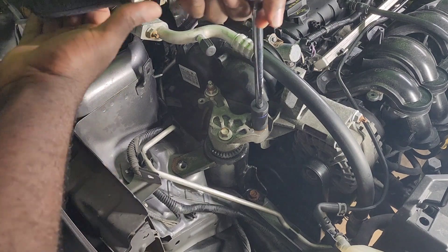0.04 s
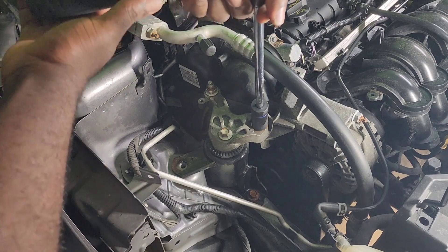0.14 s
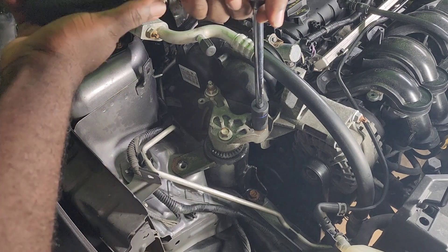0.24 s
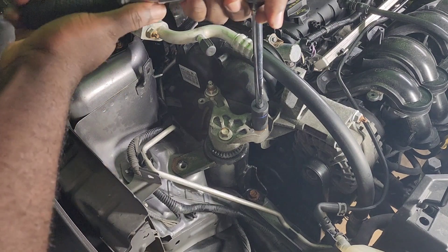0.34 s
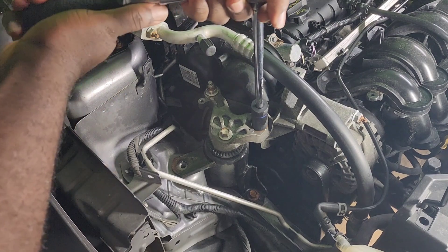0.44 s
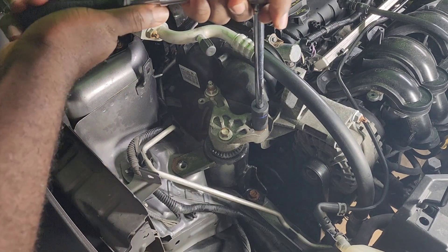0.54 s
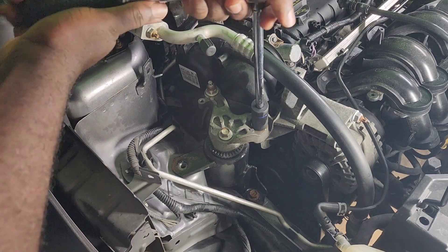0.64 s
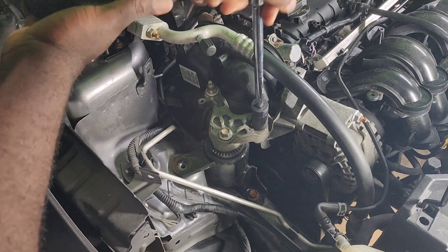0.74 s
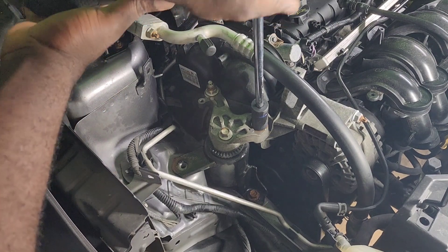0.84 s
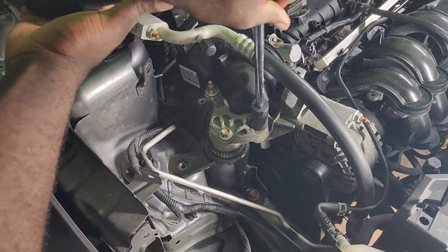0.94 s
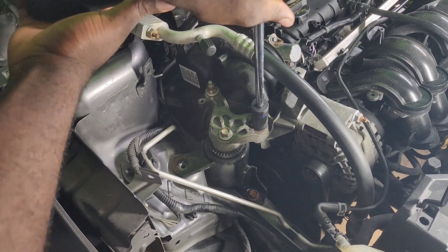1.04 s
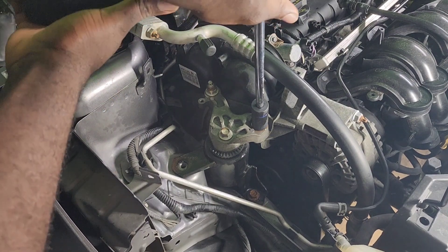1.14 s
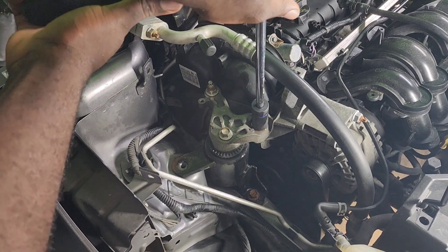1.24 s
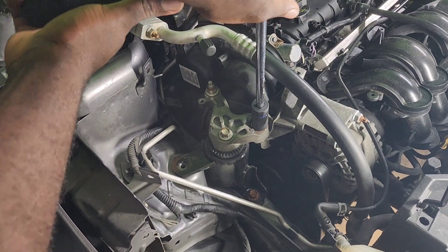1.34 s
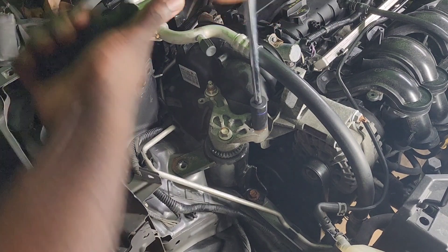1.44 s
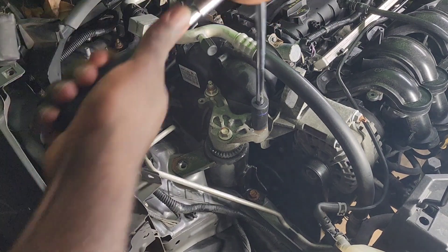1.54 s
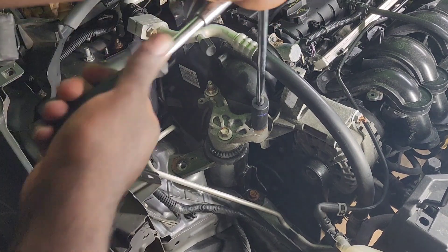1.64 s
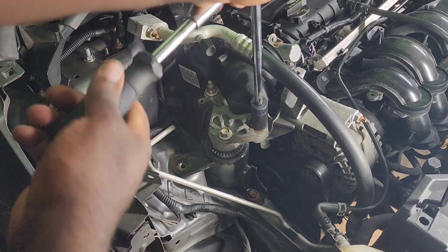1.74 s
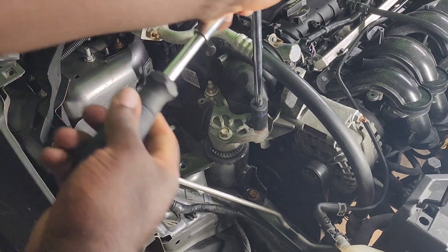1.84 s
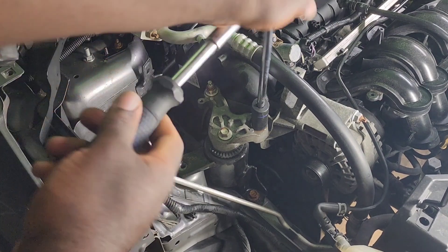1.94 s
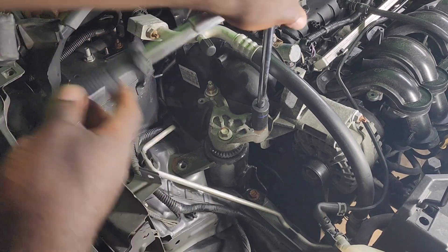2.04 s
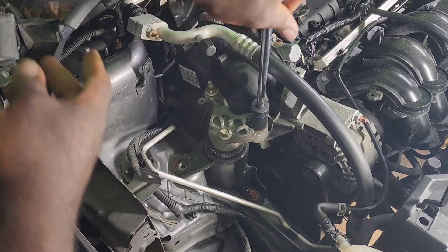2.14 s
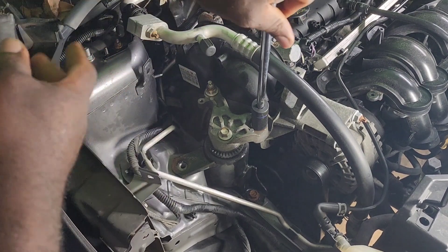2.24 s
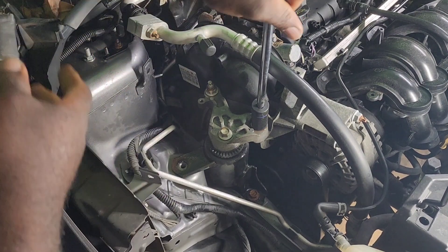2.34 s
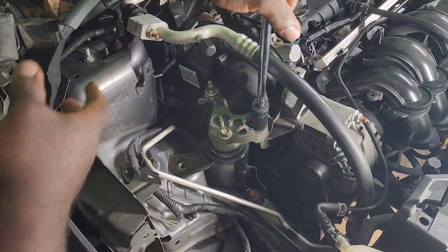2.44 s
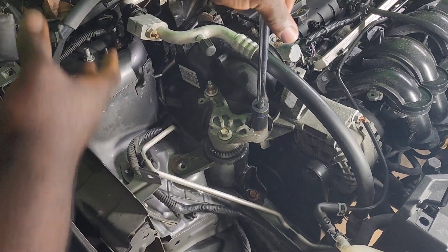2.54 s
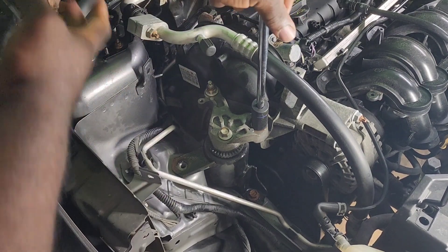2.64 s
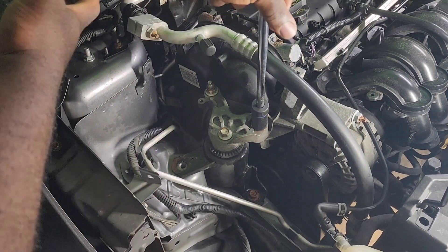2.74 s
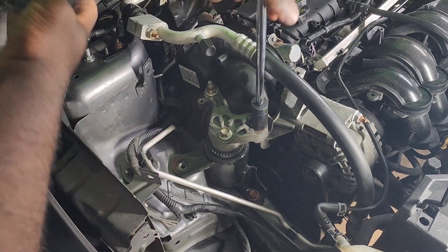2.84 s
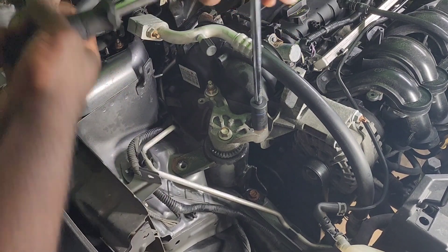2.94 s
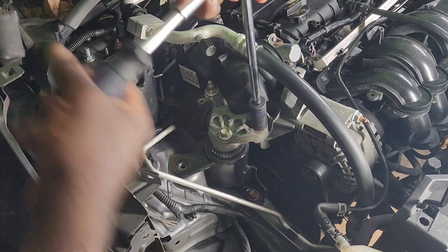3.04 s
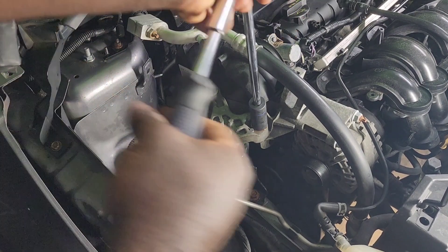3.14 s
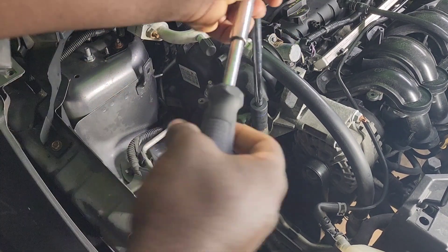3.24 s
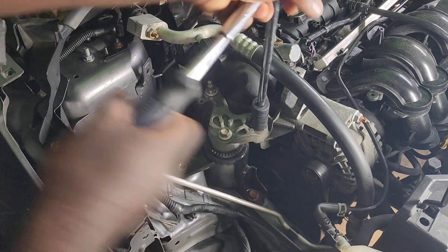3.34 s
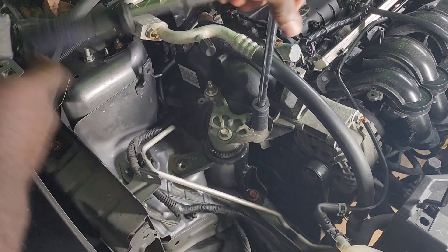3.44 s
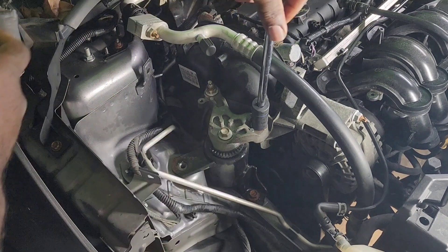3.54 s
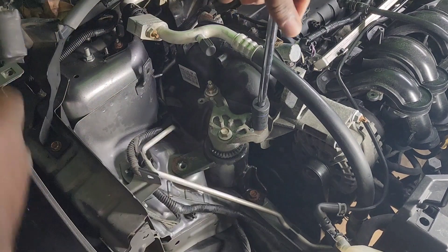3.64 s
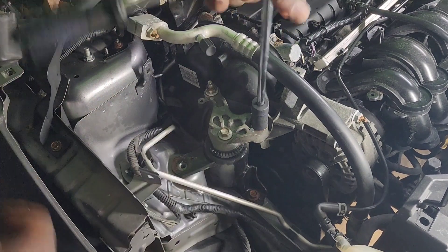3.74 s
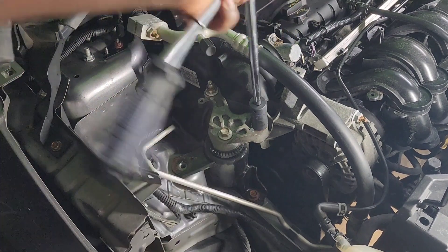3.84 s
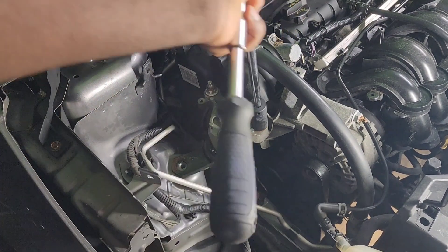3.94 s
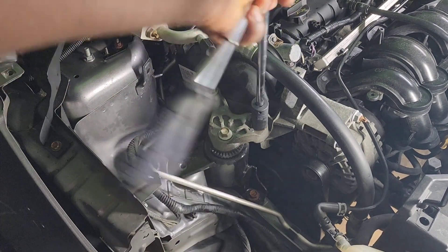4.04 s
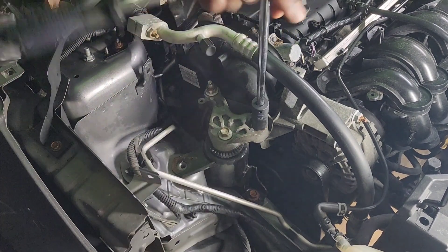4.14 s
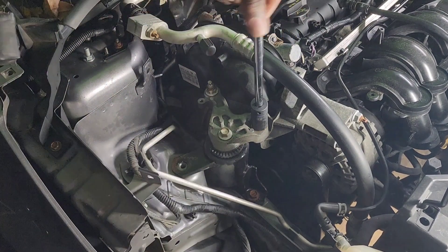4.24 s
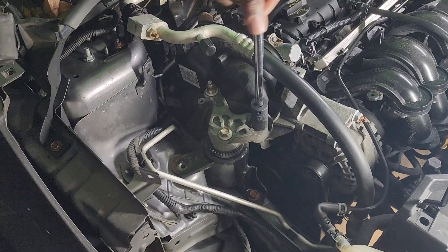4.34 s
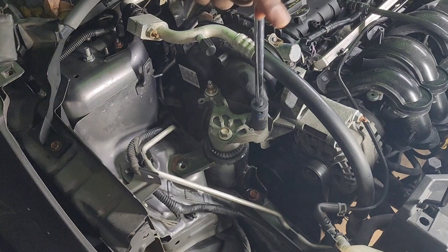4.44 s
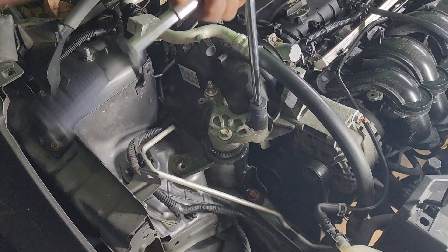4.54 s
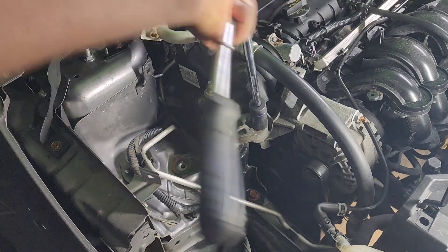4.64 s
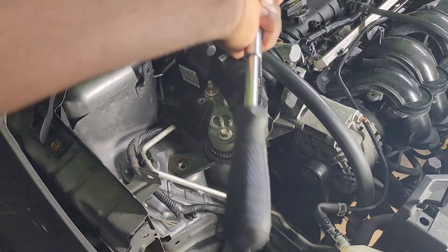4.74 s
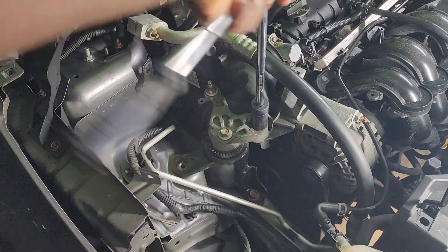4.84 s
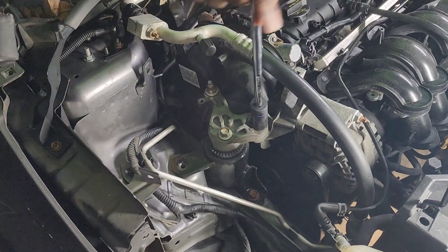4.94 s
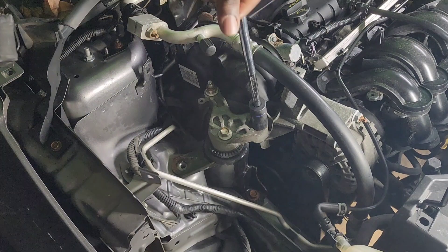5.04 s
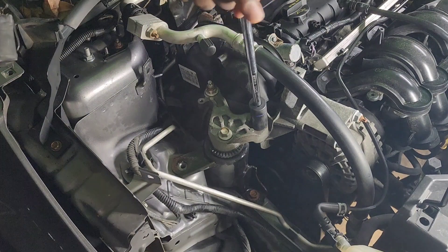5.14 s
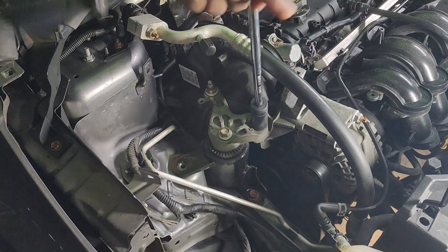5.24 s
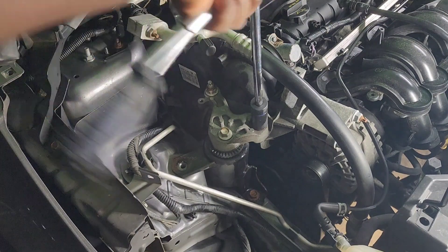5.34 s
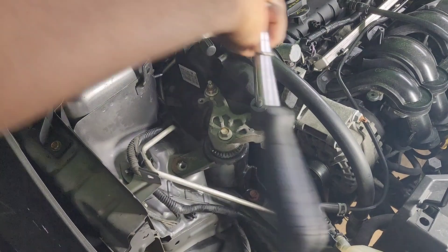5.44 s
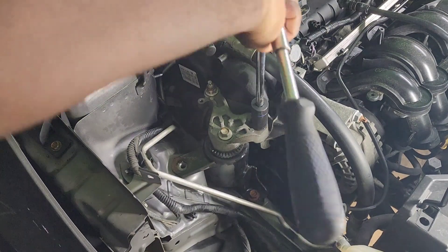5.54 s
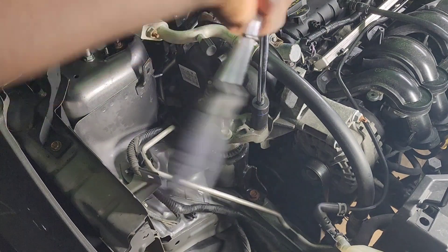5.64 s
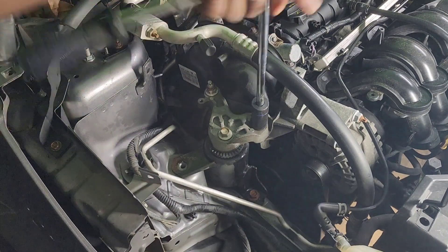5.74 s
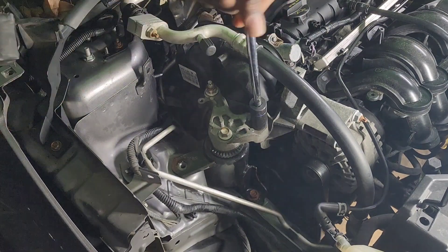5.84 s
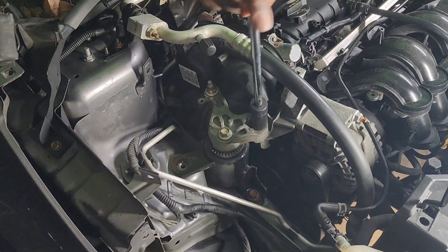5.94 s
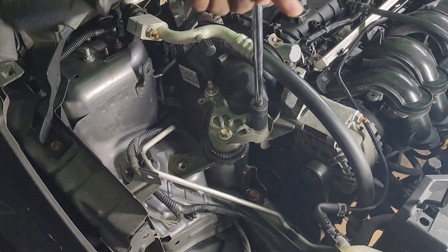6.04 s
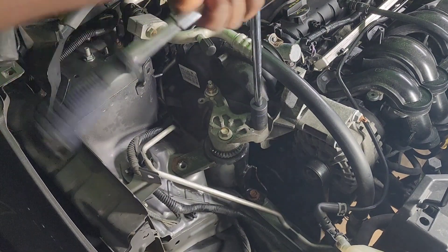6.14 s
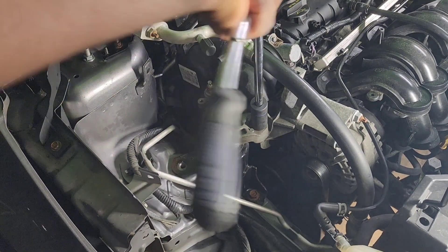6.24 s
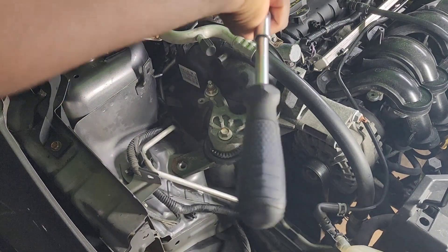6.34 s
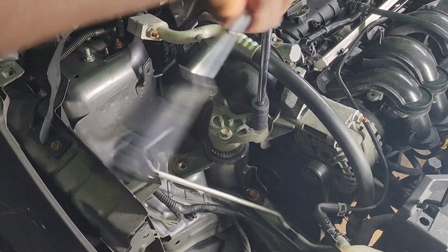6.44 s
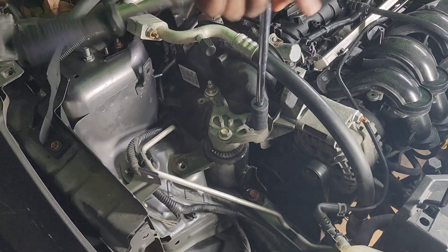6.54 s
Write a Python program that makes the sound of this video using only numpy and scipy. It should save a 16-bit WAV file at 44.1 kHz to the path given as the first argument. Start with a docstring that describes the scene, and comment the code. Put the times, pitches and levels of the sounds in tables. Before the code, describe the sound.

Close metal ticks and knocks alternate with quick bursts of ratchet clicking as a bolt is turned out, over a faint garage hum.

```python
"""A ratchet wrench on a long extension turns a bolt out of an engine; stereo microphone close by, in a
reverberant garage. First, over low room rush and a faint mains hum, a tick and a few dull bumps of the
hand. From 1.5 s hands rub on the tool and the socket ticks in its play; at 2.1 s the pawl clicks through
a short back swing, and at 3 s the wrench knocks hard on the engine. Five more back swings follow, each a
fast run of pawl clicks, with socket and extension ticking and knocking on the pulls between them."""
import sys
import numpy as np
from scipy import signal
from scipy.fft import rfft, irfft, next_fast_len
from scipy.io import wavfile
from scipy.ndimage import map_coordinates

SR = 44100
rng = np.random.default_rng(int(sys.argv[2]) if len(sys.argv) > 2 else 0)


def unload_wav(signal):
    """Save mono or channel-first audio to the path in sys.argv[1] as 16-bit WAV at rate SR, clipped to [-1, 1]."""
    wavfile.write(
        sys.argv[1],
        SR,
        np.round(np.clip(np.atleast_2d(signal).T, -1, 1) * 32767).astype(np.int16),
    )


N = 290157
HIT_SAMPLES = 2048
PATHS = 6  # to the microphone's left and right side, then to four walls


def amp(db):
    """Decibels to gain; table levels are relative, each source adds its own gain."""
    return 10 ** (np.asarray(db) / 20)

def unit(x):
    """Scaled to rms 1."""
    return x / np.sqrt(np.mean(x ** 2) + 1e-20)

def along(points, hz):
    """(frequency, value) points read on a log axis."""
    f, v = np.transpose(points)
    return np.interp(np.log(hz + 1), np.log(f + 1), v)

def curve(points):
    """(time, value) points read at every sample."""
    return np.interp(np.arange(N) / SR, *np.transpose(points))

def wobble(rate):
    """A smooth random curve, rate knots a second."""
    return map_coordinates(rng.standard_normal(int(N * rate / SR) + 4), [np.arange(N) * rate / SR])

def filtered(x, response):
    """x times a response of frequency."""
    m = next_fast_len(N + SR // 2)
    return irfft(rfft(x, m) * response(np.fft.rfftfreq(m, 1 / SR)), m)[..., :N]

def causal(spectrum):
    """Response of the given colour that rings only after the blow."""
    cepstrum = irfft(np.log(amp(along(spectrum, np.fft.rfftfreq(HIT_SAMPLES, 1 / SR)))))
    cepstrum[1:HIT_SAMPLES // 2] *= 2
    cepstrum[HIT_SAMPLES // 2 + 1:] = 0
    return np.exp(rfft(cepstrum))

def spread(pair, likeness):
    """Two unrelated signals mixed to left and right, by (frequency, likeness) points."""
    m = next_fast_len(pair.shape[1])
    turn = np.arccos(np.clip(along(likeness, np.fft.rfftfreq(m, 1 / SR)), -1, 1)) / 2
    mid, side = irfft(rfft(pair, m) * [np.cos(turn), np.sin(turn)], m)[:, :pair.shape[1]]
    return np.array([mid + side, mid - side])

def noise(spectrum, likeness):
    """Coloured stereo noise of rms 1."""
    pair = filtered(rng.standard_normal((2, N)), lambda hz: amp(along(spectrum, hz)))
    return unit(spread(pair, likeness))

def add(track, s, sound):
    """Mix a sound in at time s."""
    part = track[:, max(round(s * SR), 0):][:, :sound.shape[-1]]
    part += sound[..., :part.shape[1]]

def reflections(x, t60s, colour, onset_s):
    """A diffuse tail for each row of x; each frequency dies at its own speed."""
    hz, t, grains = signal.stft(rng.standard_normal((len(x), SR)), SR, nperseg=256)
    shape = amp(-60 * t / along(t60s, hz)[:, None]) * (1 - np.exp(-t / onset_s))
    shape *= amp(along(colour, hz))[:, None] / np.sqrt(SR * np.mean(shape ** 2, axis=1, keepdims=True))
    tail = signal.istft(grains * shape, SR, nperseg=256)[1]
    return signal.fftconvolve(x, tail, axes=1)[:, :N]


# The low rush of the garage: (time [s], level [dB])
RUSH_LEVEL = [(0.0, -56), (1.26, -53.5), (1.72, -50.5), (2.11, -54.5), (4.63, -53), (5.77, -56.5),
              (6.27, -53.5), (6.58, -53)]
# Three bands of room tone around the microphone: (frequency [Hz], density [dB])
RUMBLE_SPECTRUM = [(20, -24), (45, -4.5), (70, -14.5), (110, 5), (160, 1.5), (260, -58), (600, -52)]
RUSH_SPECTRUM = [(80, -9), (170, -11), (240, 1.5), (350, -5), (500, -9), (700, -11.5), (1000, -23.5),
                 (2000, -24), (4000, -28), (9000, -51)]
HISS_SPECTRUM = [(500, -18.5), (2500, -15), (5000, 7), (7500, 14), (8600, 9), (9300, -29), (16000, -16.5)]

def room_tone():
    """A wavering rumble and rush under a faint, steady hiss."""
    rumble = amp(-59.5 + wobble(4.6)) * noise(RUMBLE_SPECTRUM, [(50, 0.94), (200, 0.95)])
    rush_db = curve(RUSH_LEVEL) + 0.1 + wobble(12)
    rush = amp(rush_db) * noise(RUSH_SPECTRUM, [(200, 1.0), (600, 0.51), (1500, 0.067)])
    hiss = amp(-74) * noise(HISS_SPECTRUM, [(500, .3), (4000, .1)])
    return rumble + rush + hiss

# The hum in the background: (time [s], level [dB])
HUM_LEVEL = [(0, -63.5), (1.3, -59), (3.3, -56), (4.5, -53.5)]
# Its tones: (frequency [Hz], level [dB])
HUM_TONES = [(59.6, 0.5), (119, -11), (274.5, -11)]

def mains_hum():
    """A mains machine hums, slowly louder, each tone slightly unsteady in level and phase."""
    t = np.arange(N) / SR
    tones = sum(amp(db + 0.78 * wobble(3.43)) * np.sin(2 * np.pi * hz * t + 0.28 * wobble(2.5))
                for hz, db in HUM_TONES)
    return amp(curve(HUM_LEVEL)) * np.sqrt(2) * tones

# The garage's reverberation: (frequency [Hz], t60 [s])
GARAGE_DECAY = [(150, 0.52), (400, 0.22), (1040, 0.95), (2760, 0.77), (5000, 0.83), (7500, 0.64),
                (12500, 0.43), (16000, 0.46)]
# What its walls send back: (frequency [Hz], level [dB])
WALL_COLOUR = [(150, 9), (500, 5.5), (1500, -1.5), (4000, -4), (7000, -2.5), (10000, -4.5), (12500, -9),
               (16000, -4)]

def garage(to_walls):
    """The garage rings on from four walls, two on each side of the microphone."""
    walls = reflections(to_walls, GARAGE_DECAY, WALL_COLOUR, onset_s=0.0019)
    return amp(-7) * walls.reshape(2, 2, N).sum(axis=0) * amp([[.5], [-.5]])

def engine_bay(near):
    """The bay around the tool answers at once with a short, dark tail."""
    return amp(-7) * reflections(near, t60s=[(300, 0.12), (12000, 0.13)],
                                 colour=[(500, 8.5), (5000, -0.7), (12000, -6.0)], onset_s=0.0027)

# Hand and handle bump against the engine bay: (time [s], level [dB])
BUMP_HITS = [(0.58, -34.5), (0.619, -33.5), (0.658, -39.5), (0.73, -35.5), (0.908, -39), (1.581, -35.5),
             (1.628, -37.5), (2.999, -32)]
# Their dull thud: (frequency [Hz], density [dB])
THUD_SPECTRUM = [(30, 0), (60, -1.5), (110, 1), (180, -4.5), (280, -5), (450, -26), (900, -45), (2000, -59)]

def bumps():
    """Soft contact, left of centre: a low push that swells and dies without ringing."""
    track, t = np.zeros((2, N)), np.arange(HIT_SAMPLES) / SR
    for s, db in BUMP_HITS:
        push = t * np.exp(-t / 0.01) * rng.standard_normal(HIT_SAMPLES)
        thud = unit(irfft(rfft(push) * causal(THUD_SPECTRUM)))
        add(track, s - .005, amp(db - 12) * thud)
    return track * amp([[2.5], [-2.5]])

# Each slide of the hands, close to the microphone: (time [s], length [s], level [dB])
HAND_SLIDES = [(0, 0.02, -50.5), (0.556, 0.049, -58.5), (0.838, 0.041, -60), (1.57, 0.054, -44),
               (1.788, 0.36, -51.5), (2.706, 0.25, -53), (3.712, 0.39, -51), (4.413, 0.1, -44),
               (4.836, .04, -51), (5.197, 0.21, -45.5), (5.688, .02, -43.5), (6, 0.73, -43)]
# Skin on steel: (frequency [Hz], density [dB])
SKIN_SPECTRUM = [(400, 4.5), (900, 1), (2000, -6), (4500, 1), (8000, -2), (9300, -20.5), (13000, -8.5),
                 (16000, -21.5)]

def hands(attack_s=0.016, release_s=0.053, ease_db_per_s=14.5):
    """Skin sticks and slips on the tool; each slide fades in, eases and fades out."""
    t, pressure = np.arange(N) / SR, np.zeros(N)
    for s, length, db in HAND_SLIDES:
        edges = np.minimum(t - s, 0) / attack_s + np.minimum(s + length - t, 0) / release_s
        pressure += amp(db - ease_db_per_s * np.clip(t - s, 0, length)) * np.exp(edges)
    stick_slip = amp(-3.5 + 3.24 * wobble(70) + 1.3 * wobble(270))
    return pressure * stick_slip * noise(SKIN_SPECTRUM, [(500, 1.0), (4000, 0.24)])

# The tool's balance at the microphone: (frequency [Hz], left minus right [dB])
MIC_BALANCE = [(300, 7), (800, -6.5), (2500, -0.5), (5000, -5), (7500, -4), (9000, 12), (12000, -0.5),
               (15000, 6.5)]

def close_microphone(pair, left_lead_s=.00004):
    """The left side hears the tool slightly sooner, and each side in its own colour."""
    side = np.array([[1], [-1]]) / 2
    return filtered(pair, lambda hz: amp(side * along(MIC_BALANCE, hz))
                    * np.exp(2j * np.pi * hz * side * left_lead_s))

# The head's high ping; the body of the tool and what it touches: (frequency [Hz], density [dB])
PING_SPECTRUM = [(7000, -118), (9500, -22), (10900, -4), (11400, -3.5), (12000, 5.5), (12900, 5),
                 (13800, -3), (15600, -11.5), (16500, -45)]
BODY_SPECTRUM = [(60, -18.5), (160, -10.5), (350, -5), (580, -5), (750, 5), (950, -0.5), (1200, 1),
                 (1400, -2), (1900, -0.5), (2600, 0), (5000, -79.5)]
# The steel as both sides of the microphone hear it: (frequency [Hz], likeness [0..1])
MIC_LIKENESS = [(200, 0.96), (700, 0.9), (2000, 0.47), (5000, 0.24), (8000, 0.55), (12500, 0.15)]

def contacts(hits, steel, level_db, ping_db, body_db, walls_db, rise_s, chatter_s, swell_db, swell_t60):
    """Each click swells in faintly, strikes and chatters briefly; each path hears its own ring."""
    lead_s = .014
    track, t = np.zeros((PATHS, N)), np.arange(HIT_SAMPLES) / SR - lead_s
    resonances = np.array([causal(steel), causal(PING_SPECTRUM), causal(BODY_SPECTRUM)])[:, None]
    swell = amp(swell_db - 60 * np.abs(t) / swell_t60)
    strike = (1 + np.tanh(t / rise_s)) / 2
    for s, db, ping, body, t60, pan in hits:
        force = swell + strike * amp(-60 * np.maximum(t - chatter_s, 0) / max(t60, .002))
        rings = irfft(rfft(force * rng.standard_normal((PATHS, HIT_SAMPLES))) * resonances)
        rings /= np.linalg.norm(rings, axis=2, keepdims=True)
        gains = amp(db + level_db + np.array([0, ping + ping_db, body + body_db]))
        sound = np.tensordot(gains, rings, 1)
        sound[:2] = spread(sound[:2], MIC_LIKENESS) * amp([[pan / 2], [-pan / 2]])
        add(track, s - lead_s, sound)
    track[2:] *= amp(walls_db)
    return track

# Knocks on the engine: (time [s], level [dB], ping [dB], body [dB])
KNOCK_HITS = [(1.554, -34.5, -27, 5.5), (1.591, -29.5, -15, -13), (1.613, -30.5, -4, -8),
              (2.0383, -35.5, -31, 3), (3.001, -2, -3, -12), (3.0034, -12.5, -11, -3),
              (3.7259, -19, -15, -1.5), (4.4503, -34, -10, 8), (5.2192, -21, -7, -0.5),
              (6.0943, -11, -1, -11.5), (6.0999, -13.5, -4, -3)]
# Broad resonances of the struck bracket: (frequency [Hz], density [dB])
BRACKET_SPECTRUM = [(600, -24.5), (1150, -25), (1450, -4), (1900, 0), (2350, -0.5), (3000, -6), (3650, -5),
                    (4080, 1.5), (4600, 1.5), (5500, -9), (6600, 1), (7800, -3.5), (9200, -20),
                    (14000, -42)]

def knocks(t60=0.015, pan_db=3.5):
    """The wrench takes up the load and knocks on the engine."""
    hits = [(*knock, t60, pan_db) for knock in KNOCK_HITS]
    return contacts(hits, BRACKET_SPECTRUM, level_db=10.5, ping_db=-2.5, body_db=0, walls_db=-1.5,
                    rise_s=0.00096, chatter_s=0.0012, swell_db=-18.5, swell_t60=0.015)

# Modes of the extension bar: (frequency [Hz], level [dB], t60 [s])
BAR_MODES = [(1171, -9, .06), (1920, -37, 0.015), (2460, -24.5, 0.036), (3940, 3, 0.03), (4680, -23, 0.11)]

def extension_bar():
    """Each knock rings the bar's modes at new strengths."""
    track, t = np.zeros((PATHS, N)), np.arange(SR // 4) / SR
    for s, db, *_ in KNOCK_HITS:
        ring = sum(amp(level + rng.normal(0, 1.7) - 60 * t / t60) * np.sin(2 * np.pi * hz * t)
                   for hz, level, t60 in BAR_MODES)
        add(track, s, amp(db - 21.5) * ring)
    track[2:] *= amp(-7.5)  # deep in the engine bay, so less of it reaches the walls
    return track

# Narrow modes of socket and ratchet head: (frequency [Hz], level [dB], t60 [s])
SOCKET_MODES = [(3450, -13, 0.17), (5510, -13.5, 0.13), (5500, -11, 0.057), (6390, -11.5, 0.085),
                (7600, -6.5, 0.063), (7440, -10, 0.087), (8570, -7.5, 0.046), (11500, -11, .05),
                (12550, -15.5, 0.043), (11740, -22, 0.057), (13700, -12, .06)]

def socket_ring(clicks):
    """Every click sets the same steel modes ringing briefly."""
    t = np.arange(SR // 6) / SR
    ring = sum(amp(db - 60 * t / t60) / (t60 * SR) * np.cos(2 * np.pi * hz * t)
               for hz, db, t60 in SOCKET_MODES)
    return amp(28) * signal.oaconvolve(clicks, ring[None], axes=1)[:, :N]

# Ticks, mostly left of centre, with a few lone pawl clicks at the edges of back swings: (time [s], level [dB],
# ping [dB], left minus right [dB])
TICK_HITS = [(.1044, -26.5, -40, 4.5), (1.5714, -43, -23, 2), (1.6402, -23, -8, 5), (1.8686, -29.5, -12, 3),
             (1.9295, -31, 2.5, 7), (1.9727, -34.5, -12.5, 12), (2.0039, -28, -22, 7),
             (2.0993, -27, 3.5, 2), (2.3, -26.5, 12.5, -1), (2.7554, -15, -12, 3), (2.8766, -16, -5.5, 9.5),
             (3.4163, -23, 11.5, 3), (3.7224, -15, -11, 6.5), (3.7859, -9.5, -7, 5), (3.792, -12.5, -15, 8),
             (3.8464, -22.5, -15, 6), (3.9083, -17.5, -15, 7), (3.9617, -16.5, -20, 6),
             (4.0765, -24, -35, .5), (4.4941, -15, -24, 5), (4.578, -18, -12, 4), (4.6404, -11.5, -12, 5),
             (4.6926, -14, -6.5, 3), (5.0796, -18.5, 3, 3), (5.2149, -14.5, -14, 10.5),
             (5.2577, -13, -4, 8), (5.3476, -19, -10, 5.5), (5.4019, -17.5, -23, 2),
             (5.4644, -15, -21, 4.5), (5.6072, -29, -32, -3.5), (5.9291, -22.5, 8, 1), (6.0755, -1, 1, -1),
             (6.1478, -13, -7, -2), (6.271, -13, -24, 6.5), (6.316, -15.5, -12, -2), (6.374, -18, -21, 3),
             (6.404, -13.5, -17, 3), (6.462, -18, -16, -1.5)]
# Broad resonances of the shank, rung by ticks and pawl alike: (frequency [Hz], density [dB])
SHANK_SPECTRUM = [(700, -42), (1600, -18.5), (2300, -9), (3000, -4), (3700, -1), (4900, -1.5), (5400, 0),
                  (5900, -0.5), (6500, 3), (7300, 3), (8200, -0.5), (9000, -13), (11000, -21),
                  (16000, -23.5)]

def play_ticks(typical_db=-20.5, halving_db=25.5):
    """Socket and extension tick in their play, and a few lone pawl clicks fall just before or after a back
    swing; the harder a tick, the shorter and thinner it is."""
    hits = []
    for s, db, ping, pan in TICK_HITS:
        harder_db = db - typical_db
        body = -15 - 0.18 * harder_db
        t60 = 0.014 * 2 ** (-harder_db / halving_db)
        hits.append((s, db, ping, body, t60, pan))
    return contacts(hits, SHANK_SPECTRUM, level_db=9.0, ping_db=-0.5, body_db=0.5, walls_db=-1.5,
                    rise_s=0.000095, chatter_s=0.0011, swell_db=-21.5, swell_t60=0.031)

# The handle's travel close to the microphone, a list per back swing: (time [s], teeth passed [count])
BACK_SWINGS = [
    [(2.129, 0), (2.1685, 2), (2.2115, 4)],
    [(3.438, 0), (3.501, 3), (3.536, 6), (3.561, 7), (3.5947, 8)],
    [(4.1255, 0), (4.18, 3), (4.2, 4), (4.274, 7), (4.302, 8), (4.3565, 10)],
    [(4.898, 0), (4.978, 5), (5.0305, 8), (5.0705, 10)],
    [(5.716, 0), (5.7555, 2), (5.805, 5), (5.8505, 8), (5.8975, 13)],
    [(6.518, 0), (6.565, 3)],
]
# How hard the teeth strike in each swing:
# (start [dB], a third in [dB], two thirds in [dB], end [dB], first ping [dB])
SWING_FORCE = [(-18, -17, -17, -18, 3), (-26, -25.5, -19.5, -13.5, 2.5), (-13.5, -15, -12.5, -21.5, 5),
               (-11, -20, -18, -11, 1.5), (-8.5, -11, -10, -20.5, -0.5), (-21.5, -25.5, -22.5, -32, 2.5)]
# How the wrench is held in each swing:
# (body [dB], t60 [s], left minus right [dB], rebound delay [s], rebound level [dB])
SWING_GRIPS = [(-13.5, 0.028, 1, .006, 0.5), (-18.5, 0.021, 3, 0.0023, -5),
               (-17.5, 0.013, 1.5, 0.0023, -8.5), (-19, 0.011, 2.5, 0.0056, -8.5),
               (-23.5, 0.012, 2.5, .005, -10.5), (-13.5, .018, 2, 0.0027, -4)]

def pawl(ping_rise_db=5.5, rebound_needs_s=.0125):
    """The pawl drops once for each tooth that passes, and rebounds if the next tooth leaves it time."""
    hits = []
    for swing, (*force, first_ping), grip in zip(BACK_SWINGS, SWING_FORCE, SWING_GRIPS):
        body, t60, pan, delay, rebound_db = grip
        times, teeth = np.transpose(swing)
        drops = np.interp(np.arange(teeth[-1] + 1), teeth, times)
        progress = np.linspace(0, 1, len(drops))
        levels = np.interp(progress, np.linspace(0, 1, len(force)), force)
        pings = first_ping + ping_rise_db * progress  # brighter from tooth to tooth
        gaps = np.diff(drops, append=np.inf)
        for s, gap, db, ping in zip(drops, gaps, levels, pings):
            drop_scatter, rebound_scatter, pan_scatter = rng.normal(0, [1.5, 4, 0.5])  # dB
            hits.append((s, db + drop_scatter, ping, body, t60, pan + pan_scatter))
            if gap > rebound_needs_s:
                hits.append((s + delay, db + rebound_db + rebound_scatter,
                             ping, body, t60, pan - pan_scatter))
    return contacts(hits, SHANK_SPECTRUM, level_db=11.5, ping_db=-0.7, body_db=-1, walls_db=-.5,
                    rise_s=0.00034, chatter_s=0.001, swell_db=-15.5, swell_t60=0.033)

def scene():
    """Wrench and hands up close, the engine bay around them, the garage behind."""
    clicks = pawl() + play_ticks()
    wrench = clicks + socket_ring(clicks) + knocks() + extension_bar()
    near = close_microphone(wrench[:2])
    reverberation = engine_bay(near) + garage(wrench[2:])
    handling = hands() + bumps()
    background = (mains_hum() + room_tone()) * amp([[1.1], [-1.1]])
    return background + handling + reverberation + near

def record(dry, ceiling=.85, top_hz=16000):
    """The recorder rounds off the tallest peaks and keeps nothing above its band limit."""
    rounded = dry / (1 + np.abs(dry / ceiling) ** 6) ** (1 / 6)
    return filtered(rounded, lambda hz: 1 / np.sqrt(1 + (hz / top_hz) ** 160))


dry = scene()
out = record(dry)
unload_wav(out)
```